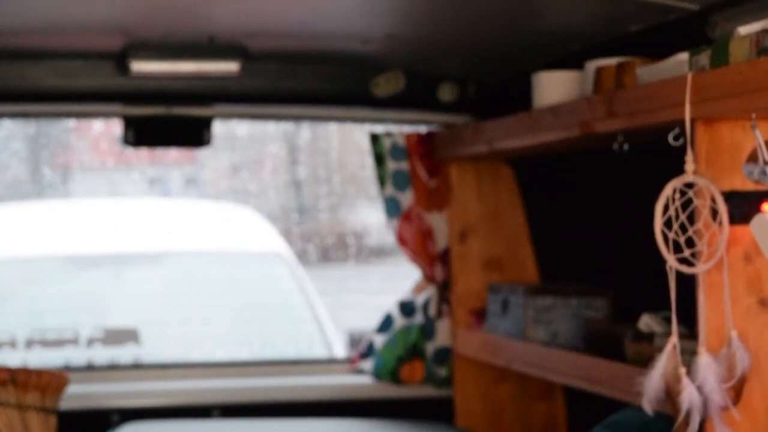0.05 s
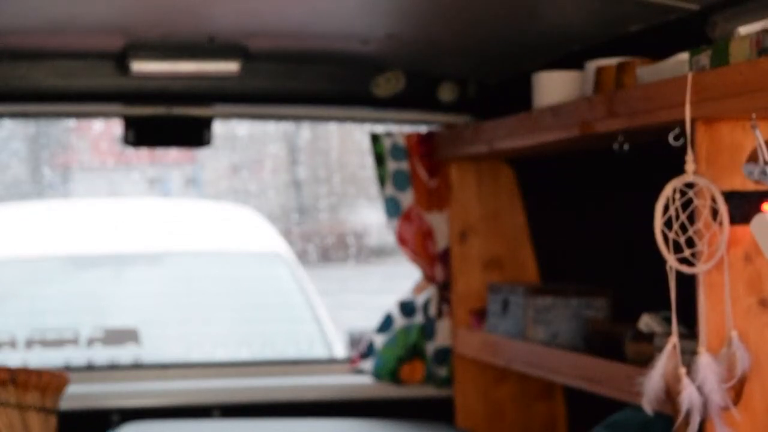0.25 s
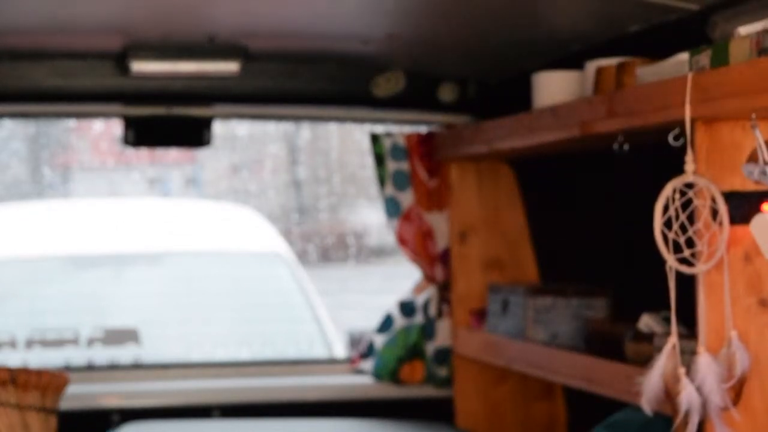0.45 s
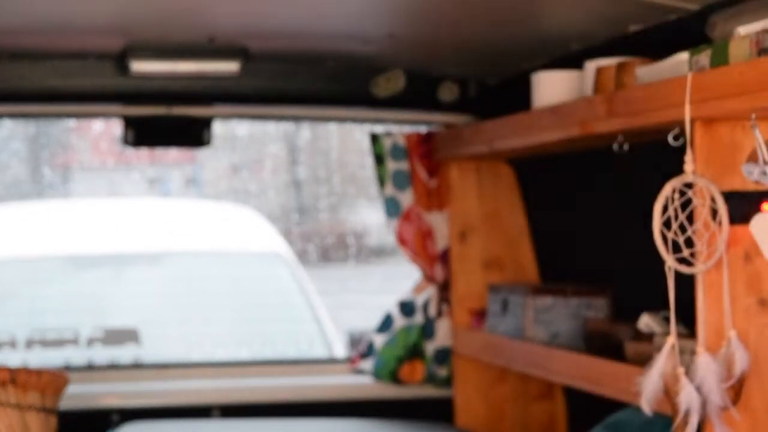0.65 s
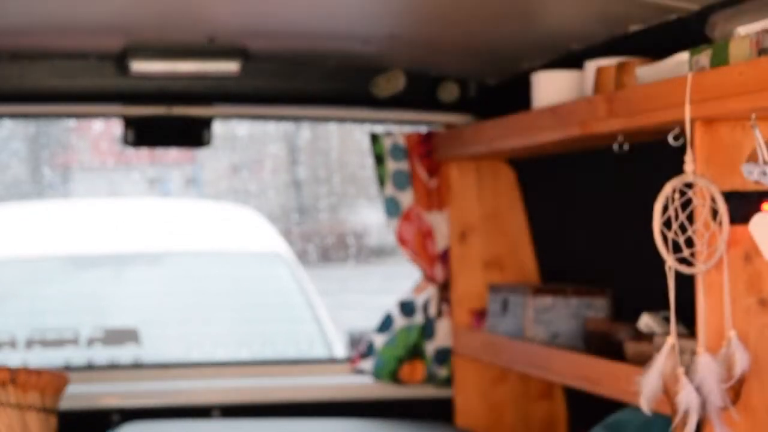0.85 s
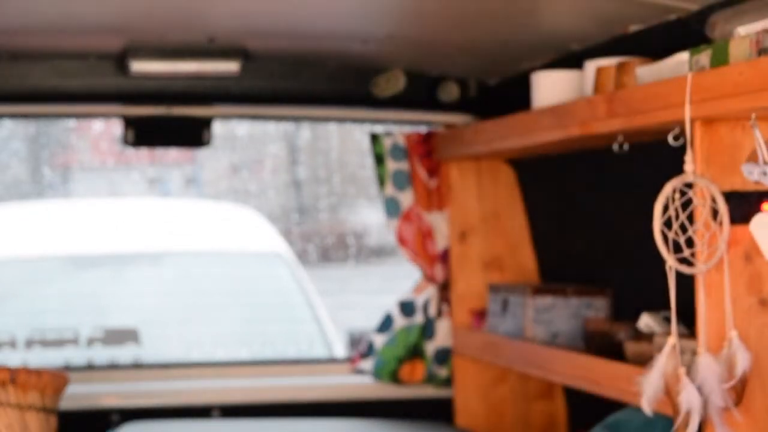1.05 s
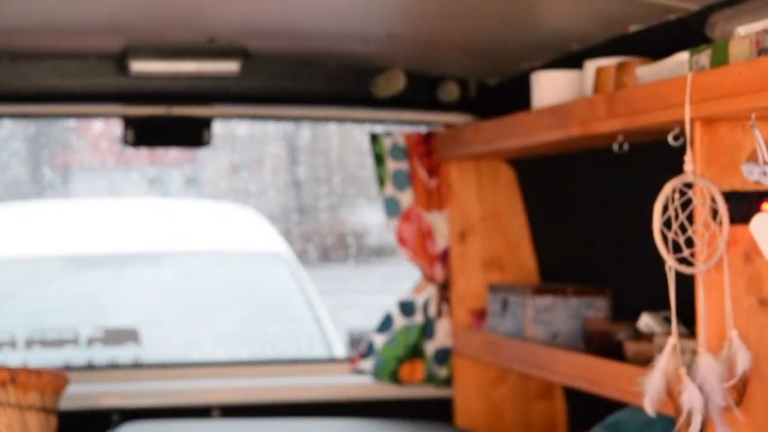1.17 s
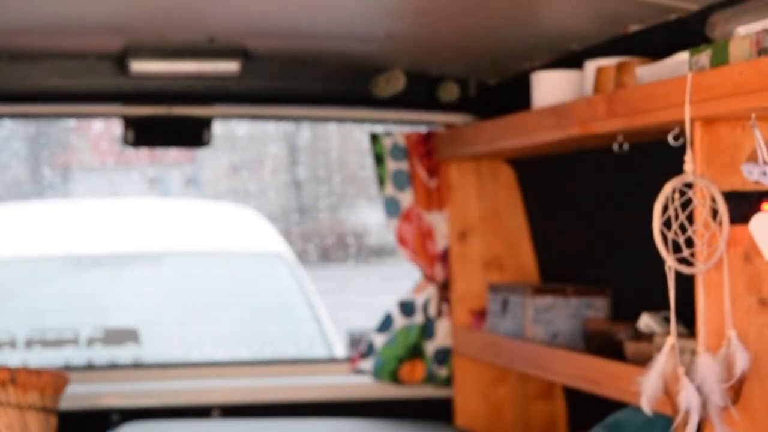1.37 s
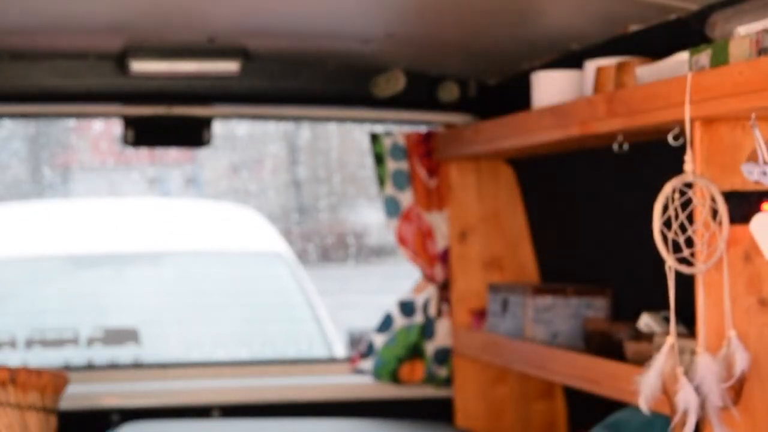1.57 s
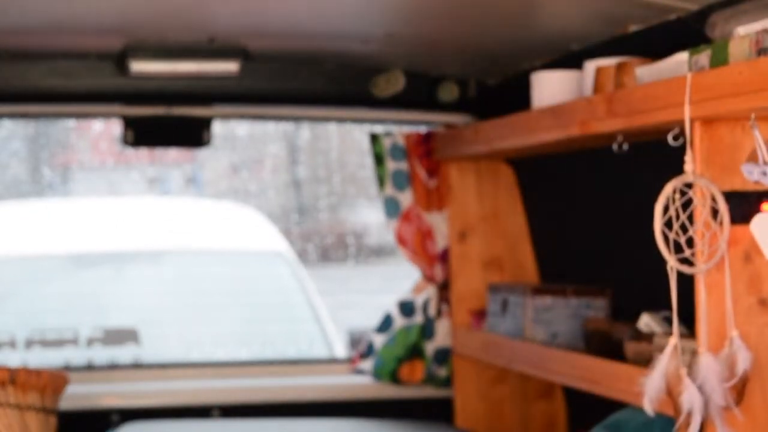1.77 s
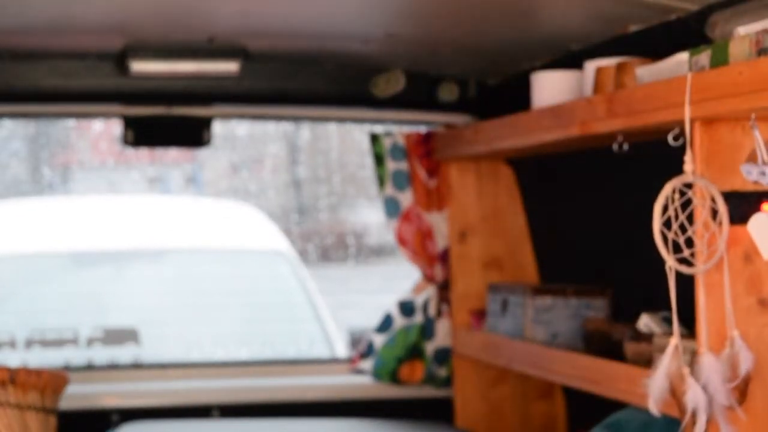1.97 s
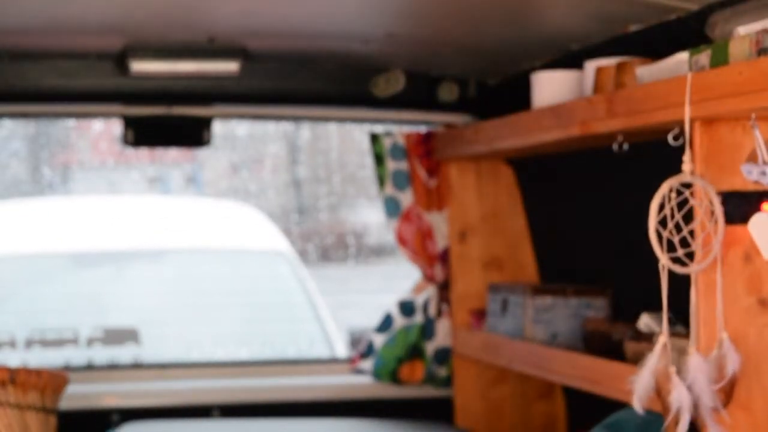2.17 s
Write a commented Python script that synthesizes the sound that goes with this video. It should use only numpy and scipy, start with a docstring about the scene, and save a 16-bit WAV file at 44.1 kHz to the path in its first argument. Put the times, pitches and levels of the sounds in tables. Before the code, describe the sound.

A van's sliding side door opens, heard close inside the small cabin: handle click, sharp latch snap, then a hollow rumbling roll with hard metal knocks, ending in a lighter double clunk at the catch.

```python
"""Inside a van: the handle of the sliding door is pulled, the latch snaps, the door rolls along its track,
knocks over joints and stops in its catch. Knocks and rolling both ring the sheet-metal door and small cabin:
short rattles strike it for the knocks, grit under the rollers shakes it for the rolling. Humming tones stand
for the track and the van body, with one low sway near 46 Hz; short pings for small parts, soft noise for air."""
import sys
import numpy as np
from scipy import signal
from scipy.fft import rfft, irfft
from scipy.io import wavfile
from scipy.ndimage import uniform_filter1d

SR = 44100
rng = np.random.default_rng(int(sys.argv[2]) if len(sys.argv) > 2 else 0)


def to_wav(s):
    """Save 16-bit WAV."""
    ch = np.atleast_2d(s).T  # columns
    pcm = np.round(np.clip(ch, -1, 1) * 32767)  # PCM
    wavfile.write(sys.argv[1], SR, pcm.astype(np.int16))


N = 97020  # length of the scene in samples, 2.2 s


def undb(db):
    """Turn dB into a gain."""
    return 10 ** (np.asarray(db) / 20)


def unit(x):
    """Scale to an average (rms) level of 1."""
    return x / np.sqrt(np.mean(x ** 2))


def on_log(hz, table):
    """Read a table of (Hz, value) rows at any pitch, along a logarithmic pitch axis."""
    table = np.array(table)
    return np.interp(np.log(hz + 1e-9), np.log(table[:, 0]), table[:, 1])


def coloured(table, size):
    """Noise whose spectrum follows a table, with nothing at or below 20 Hz."""
    hz = np.fft.rfftfreq(size, 1 / SR)
    spectrum = rfft(rng.standard_normal(size))
    return irfft(spectrum * undb(on_log(hz, table)) * (hz > 20), size)


def walk(rate):
    """Random wandering with spread 1: about `rate` new values a second, joined by straight slides."""
    hold = int(SR / rate)
    steps = np.repeat(rng.standard_normal(N // hold + 1), hold)
    return unit(uniform_filter1d(steps, hold)[:N])


def ring_off(t60, size):
    """A fade that falls by 60 dB in t60 seconds."""
    return 1000. ** (-np.arange(size) / SR / t60)


def ring(hz, t60, size):
    """One mode: a pure tone that fades away."""
    t = np.arange(size) / SR
    return np.sin(2 * np.pi * hz * t) * ring_off(t60, size)


def even(x):
    """Even out the broad spectrum of a short burst: many small contacts favour no band."""
    spectrum = rfft(x)
    smooth_power = uniform_filter1d(np.abs(spectrum) ** 2, size=20)
    evened = irfft(spectrum / np.sqrt(smooth_power), len(x))
    return evened * (np.arange(len(x)) < len(x) / 2)


def air():
    """Outdoor rumble and microphone hiss: noise strongest at low pitch, with a slowly wandering level."""
    # Colour of the noise. Each row: pitch in Hz, relative level in dB per Hz.
    air_colour = [(15, -30), (25, 11), (451, -1), (887, -5.5), (1890, -10.5), (2910, -15.5), (16000, -21)]
    level_db, wander_db = -48, 1.0
    return unit(coloured(air_colour, N)) * undb(level_db + wander_db * walk(5.15))


def track_and_body():
    """Modes of track and van body swell one after another as the door rolls; each glides and wavers."""
    # Humming modes of track and body; the one near 46 Hz is a low sway of the body.
    # Each row: pitch at the centre in Hz, glide in Hz per second, centre in seconds,
    # span of the bell-shaped swell in seconds (standard deviation), level in dB before wavering.
    hums = [(120, 20, 0.538, 0.067, -38), (289.3, -20, .76, 0.067, -23), (520, 60.5, .84, 0.15, -29.5),
            (121.2, 20, 0.95, 0.14, -30), (289.6, -71.5, 1.08, 0.086, -24.5), (560, -150, 1.07, 0.095, -25),
            (387, 150, .64, 0.068, -27.5), (250, -14.5, 1.38, .15, -25), (420, -29.5, 1.37, 0.091, -25.5),
            (46, -30, 1.7, 0.088, -42)]
    waver_hz, waver_db, waver_per_s = 7.94, 3.5, 32
    t = np.arange(N) / SR
    out = np.zeros(N)
    for hz, glide, centre, span, db in hums:
        level = undb(db + waver_db * walk(waver_per_s))
        swell = np.exp(-.5 * ((t - centre) / span) ** 2)
        pitch = hz + glide * (t - centre) + waver_hz * walk(waver_per_s)
        tone = np.sin(2 * np.pi * np.cumsum(pitch) / SR)
        out += level * swell * unit(tone)
    return out


def door(size=16384):
    """Response of door and cabin to a tap: clear modes over a dense blur of modes, split into six bands."""
    # Clear modes of door and latch. Each row: pitch in Hz, relative level in dB, time to fade 60 dB in seconds.
    clear_modes = [(89.5, -10, 0.55), (123.2, -4, 0.23), (200.5, -4.5, 0.29), (249.1, 1, 0.29),
                   (283.7, 1, 0.17), (415.8, -2, 0.055), (528.1, -8.5, 0.18), (842, -15.5, 0.032),
                   (1690, -25, 0.062), (2615, -27.5, 0.015), (3434, -33, 0.068)]
    # Dense modes between them. Each row: pitch in Hz, relative level in dB per Hz.
    dense_colour = [(30, -0.5), (60, 0.5), (125, 1.5), (255, -6.5), (420, -5), (600, -10.5), (1300, -25.5),
                    (2300, -24), (5500, -42), (8600, -46.5), (16000, -71)]
    # How long the dense modes ring. Each row: pitch in Hz, time to fade 60 dB in seconds.
    dense_t60 = [(60, 0.41), (500, 0.27), (2000, 0.16), (16000, 0.12)]
    # Edges of the six bands from thud up to tick, in Hz.
    band_edges = (40, 170, 340, 700, 1500, 4500, 20000)
    dense_db, onset_s = -1.5, 0.00023  # dense modes against clear ones; time constant of the soft start
    t, hz = np.arange(size) / SR, np.fft.rfftfreq(size, 1 / SR)

    clear = np.zeros(size)
    for f, db, t60 in clear_modes:
        sign = rng.choice((-1, 1))  # which way each mode first moves
        clear += sign * undb(db) * unit(ring(f, t60, size))

    noise = rfft(coloured(dense_colour, size))
    dense = np.zeros(size)
    for f in 30 * 2 ** np.arange(0, 9.5, .5):  # overlapping slices, half an octave apart
        slice_gain = np.clip(1 - 2 * np.abs(np.log2((hz + 1) / f)), 0, 1)
        part = irfft(noise * slice_gain, size)
        dense += part * unit(ring_off(on_log(f, dense_t60), size))

    tap = unit(clear) + undb(dense_db) * unit(dense)
    tap = tap * (1 - np.exp(-t / onset_s))
    bands = []
    for low, high in zip(band_edges, band_edges[1:]):
        band_pass = signal.butter(3, (low, high), "band", fs=SR, output="sos")
        bands.append(signal.sosfilt(band_pass, tap))
    return bands


def rolling():
    """Rollers crush grit of uneven size and ride over bumps; two rollers shake the door at different places."""
    # Loudness of the rolling over time, before bumps. Each row: time in seconds, thud level in dB,
    # boom level in dB, drum level in dB, knock level in dB, clank level in dB, hiss level in dB.
    roll_levels = np.array([(.12, -71, -56, -55.5, -57, -62, -81), (.22, -29, -46, -30, -42.5, -41.5, -49),
                            (.34, -38.5, -28, -28.5, -32.5, -44.5, -55),
                            (.45, -40, -38, -40, -49, -57, -74), (.53, -34, -33, -35.5, -44.5, -52.5, -70),
                            (0.618, -32.5, -22.5, -29, -41.5, -46, -57),
                            (.7, -24, -17, -19, -32, -40, -46.5), (.78, -29.5, -19, -21, -28.5, -35, -47.5),
                            (.97, -35, -21.5, -17.5, -28, -39.5, -49.5),
                            (1.1, -32.5, -19.5, -25, -33.5, -42.5, -51),
                            (1.23, -38, -20.5, -22, -29.5, -45, -54.5),
                            (1.4, -39.5, -20, -26, -35, -46.5, -56.5),
                            (1.57, -38.5, -27.5, -29.5, -42, -52, -58.5),
                            (1.72, -41, -42, -37.5, -47, -53, -61),
                            (1.82, -45, -40, -47.5, -53.5, -59.5, -71),
                            (2.03, -57.5, -46, -51, -51, -58, -61), (2.2, -52, -65, -61, -54, -55.5, -57.5)])
    grit_per_s, grit_spread_db = 4400, 1.5
    bump_per_s, bump_db = 20, 1.07
    t = np.arange(N) / SR
    bumps = bump_db * walk(bump_per_s)
    out = np.zeros(N)
    for roller in range(2):
        chance, size_luck = rng.random((N, 2)).T
        hits = chance < grit_per_s / SR
        grain_size = undb(-grit_spread_db * np.log(size_luck))  # a few grains are much bigger
        grit = hits * grain_size * rng.standard_normal(N)
        for band, tap in enumerate(door()):
            sound = unit(signal.fftconvolve(grit, tap)[:N])
            level_db = np.interp(t, roll_levels[:, 0], roll_levels[:, band + 1], left=-120)
            out += sound * undb(level_db + bumps - 3)  # 3 dB less each, as two rollers add up
    return out


def ticks():
    """Latch parts, rollers and catch ping briefly: each ping is one fading tone."""
    # Pings of small parts. Each row: start in seconds, pitch in Hz, starting level in dB.
    pings = [(0.1863, 8100, -31), (0.235, 8350, -12.5), (0.2342, 3560, -8.5), (0.2347, 4640, -15),
             (0.2374, 1375, -8.5), (0.373, 8700, -33), (0.3732, 932, -11), (0.3885, 8400, -34),
             (0.3885, 5000, -40), (0.4024, 8600, -37), (0.643, 8200, -42), (0.668, 8200, -31),
             (0.679, 7800, -22.5), (0.9334, 530, -8), (0.9335, 3270, -19), (0.9347, 5480, -16.5),
             (0.9435, 2330, -13), (1.592, 2720, -32.5), (1.6015, 487, -18.5), (1.6534, 2875, -22.5),
             (1.6624, 2440, -24), (1.995, 298, -38), (2.02, 514, -39)]
    # How long a ping rings. Each row: pitch in Hz, time to fade 60 dB in seconds.
    ping_t60 = [(500, .06), (1000, 0.027), (3000, 0.023), (8400, 0.0092)]
    size = 4000
    out = np.zeros(N)
    for start, hz, db in pings:
        i = int(start * SR)
        out[i:i + size] += undb(db) * ring(hz, on_log(hz, ping_t60), size)
    return out


def knocks():
    """Each knock is a sharp strike and a short rattle of metal on metal, at its own place on the door."""
    # Knocks of handle, latch, joints and catch. Each row: start in seconds, clank peak in dB,
    # thud level in dB, boom level in dB, drum level in dB, knock level in dB, tick level in dB,
    # time constant of the rattle's fade in seconds, time to fade 60 dB through damping by seals in seconds.
    hits = [(0.164, -53, -49, -35, -39.5, -42, -65, 0.0054, 0.2),
            (0.1826, -28, -61, -37, -27, -35, -39.5, 0.0077, 0.12),
            (0.19, -26, -29.5, -26, -28.5, -35.5, -47, 0.0078, 0.45),
            (0.2321, -10.5, -47, -14, -11, -19, -25, 0.013, 0.17),
            (0.2426, -15, -14, -18, -15, -17.5, -54, 0.011, 0.38),
            (0.2996, -24.5, -30, -22, -35, -25, -44.5, 0.0059, 0.2),
            (0.371, -31, -31.5, -31, -19, -17.5, -52, 0.0069, 0.23),
            (0.3857, -25.5, -37, -39, -31, -49, -47, 0.0095, 0.35),
            (0.4037, -36.5, -39, -29, -33, -36, -59, 0.01, 0.36),
            (0.6779, -19, -23.5, -11.5, -12.5, -25, -40, 0.0038, 0.23),
            (0.6996, -37, -31, -8, -23, -28, -63, 0.0026, 0.2),
            (0.9083, -15, -28, -27, -25, -22.5, -38, 0.0095, 0.26),
            (0.9269, -8, -35, -24, -11.5, -16.5, -27, 0.0076, 0.18),
            (0.95, -19, -38, -12.5, -20.5, -21, -45, 0.01, 0.31),
            (1.592, -25.5, -27.5, -19, -17.5, -25.5, -42.5, 0.0075, 0.15),
            (1.6492, -22, -31.5, -23, -23.5, -23, -42.5, 0.0067, 0.28),
            (1.665, -31, -44, -31.5, -30, -48, -52, 0.0084, 0.15)]
    rise_s = 0.00044  # time constant of the rattle's start
    strike_db, hardness = 19.5, 0.937  # first contact before evening out; treble lift of metal contact, 0 to 1
    clank_crest_db = 9.5  # how far a clank's peak stands above its rms level
    t = np.arange(4096) / SR
    out = np.zeros(N + 32768)
    for start, clank_db, thud_db, boom_db, drum_db, knock_db, tick_db, length, damp_s in hits:
        rattle = rng.standard_normal(len(t)) * (1 - np.exp(-t / rise_s)) * np.exp(-t / length)
        rattle[0] = undb(strike_db)
        rattle = even(rattle)
        rattle = np.diff(rattle, prepend=0) + (1 - hardness) * rattle
        levels_db = (thud_db, boom_db, drum_db, knock_db, clank_db - clank_crest_db, tick_db)
        i = int(start * SR)
        for tap, db in zip(door(), levels_db):
            sound = signal.fftconvolve(rattle, tap * ring_off(damp_s, len(tap)))
            loudest = np.sqrt(uniform_filter1d(sound ** 2, 800).max())  # rms of the loudest 18 ms
            out[i:i + len(sound)] += undb(db) * sound / loudest
    return out[:N]


def scene():
    """Everything summed at one microphone."""
    return (air() + track_and_body() + rolling() + ticks() + knocks())[None]


def record(dry):
    """The loudest peaks are rounded and the top is cut."""
    top_hz = 15900
    rounded = np.tanh(dry * .8) / .8
    return signal.sosfilt(signal.ellip(10, .2, 75, top_hz, fs=SR, output="sos"), rounded)


dry = scene()
out = record(dry)
to_wav(out)
```